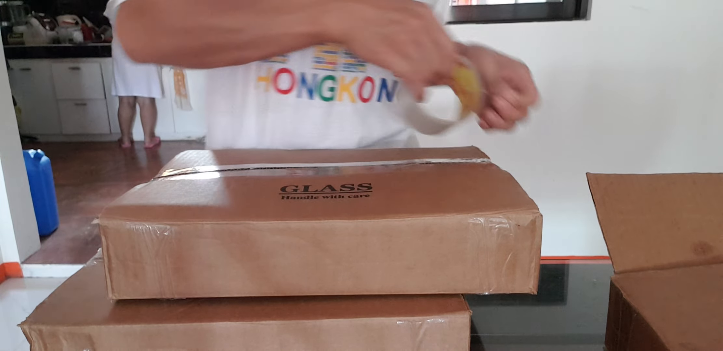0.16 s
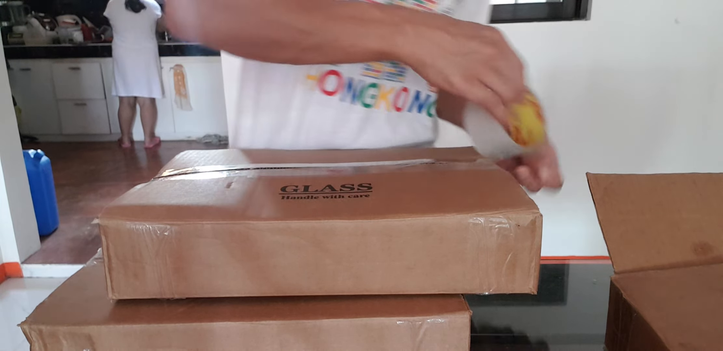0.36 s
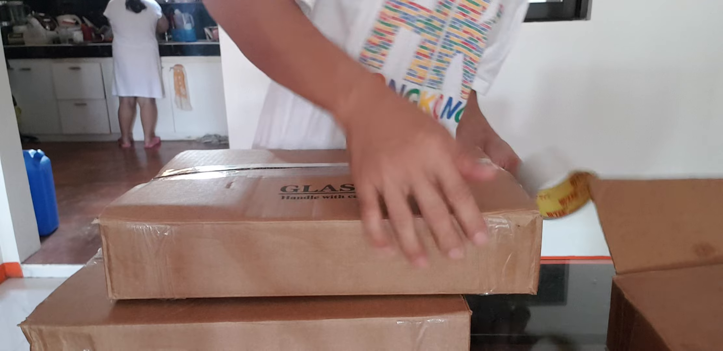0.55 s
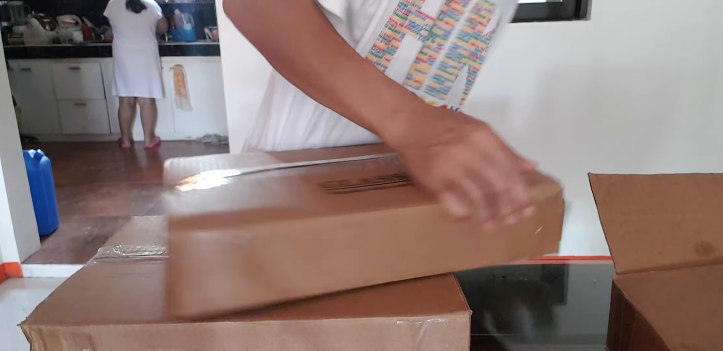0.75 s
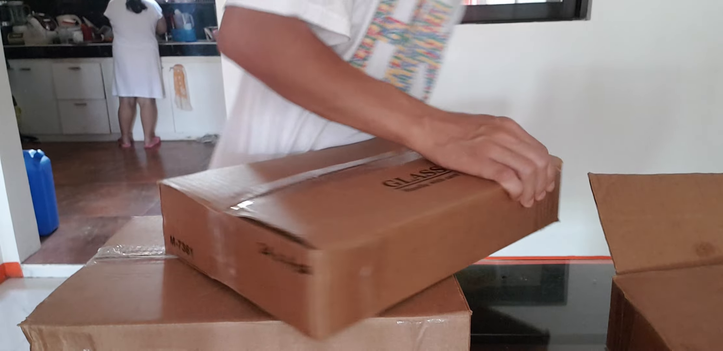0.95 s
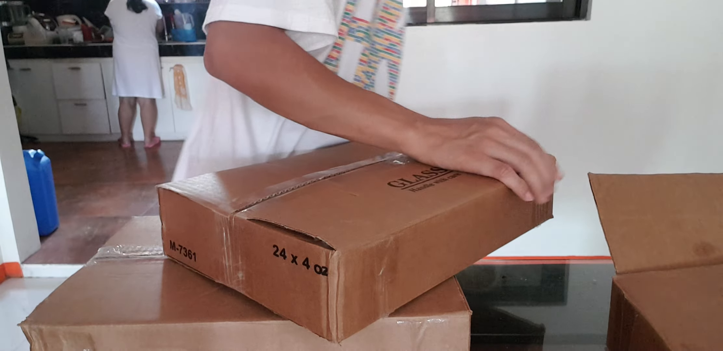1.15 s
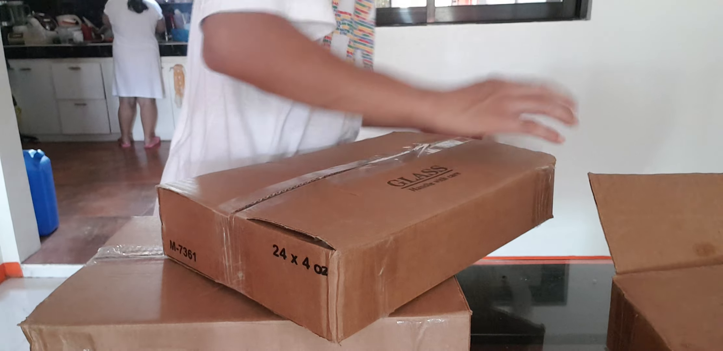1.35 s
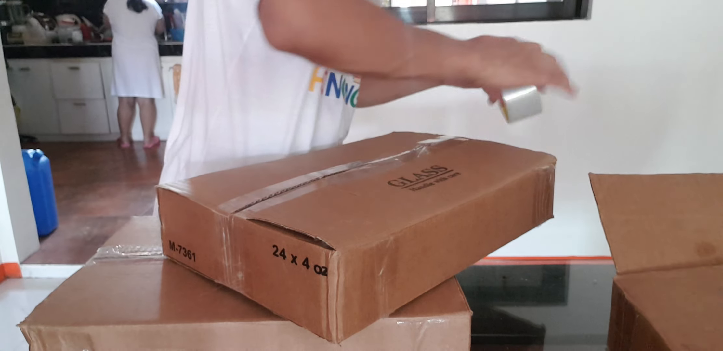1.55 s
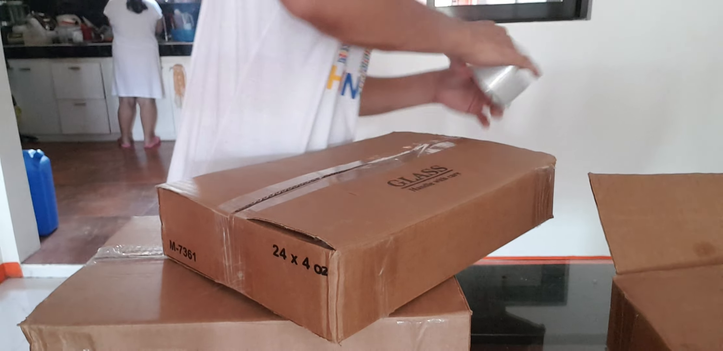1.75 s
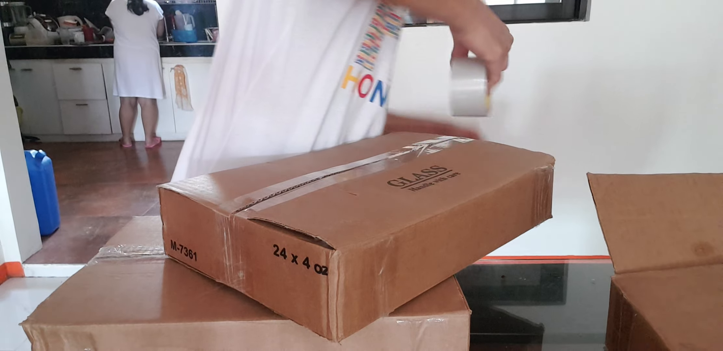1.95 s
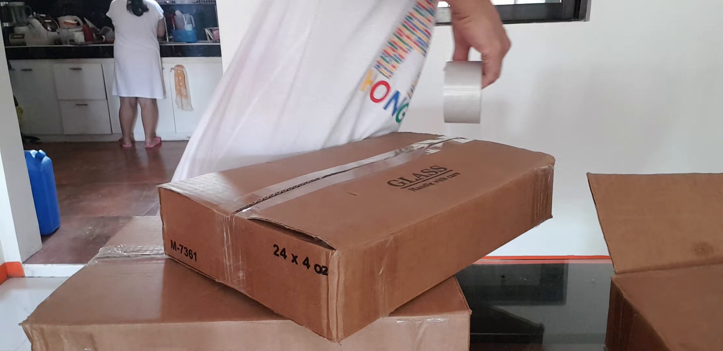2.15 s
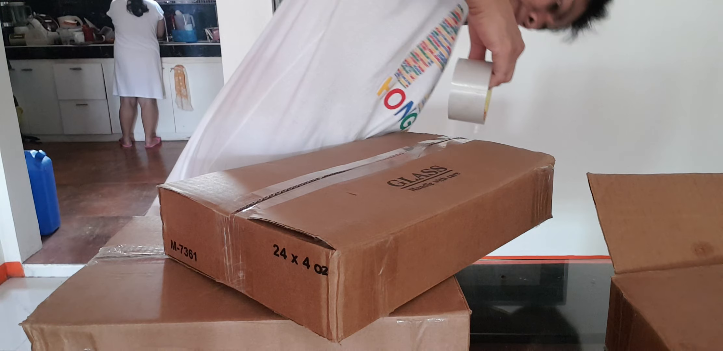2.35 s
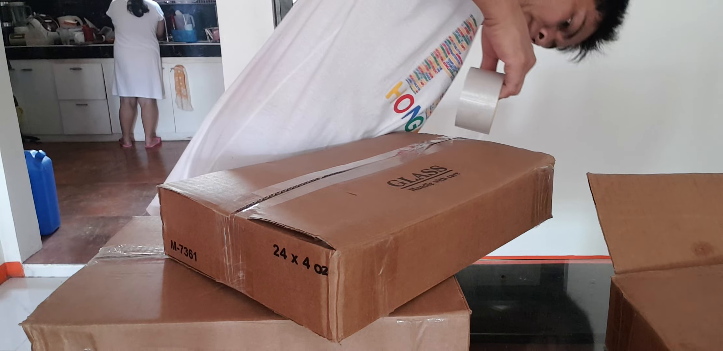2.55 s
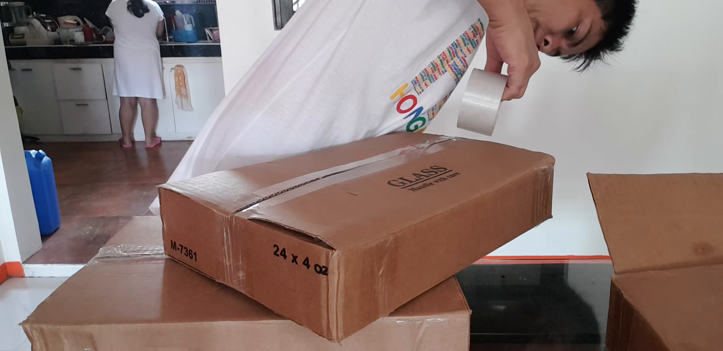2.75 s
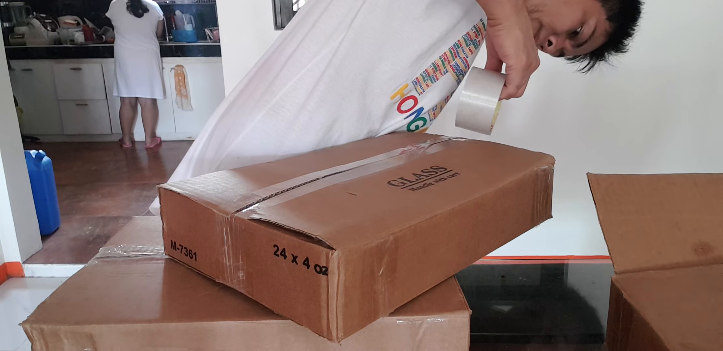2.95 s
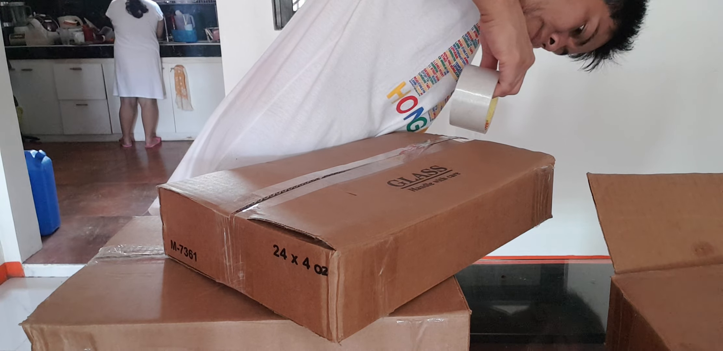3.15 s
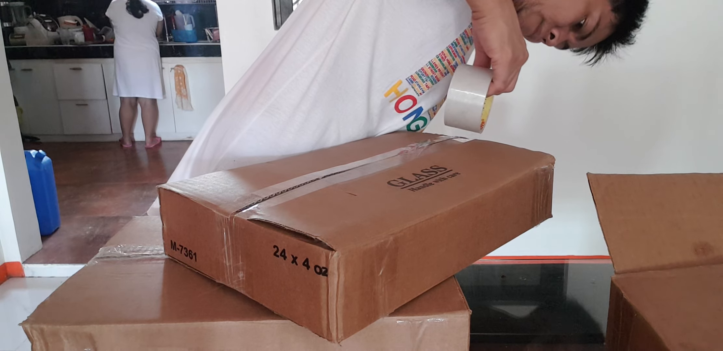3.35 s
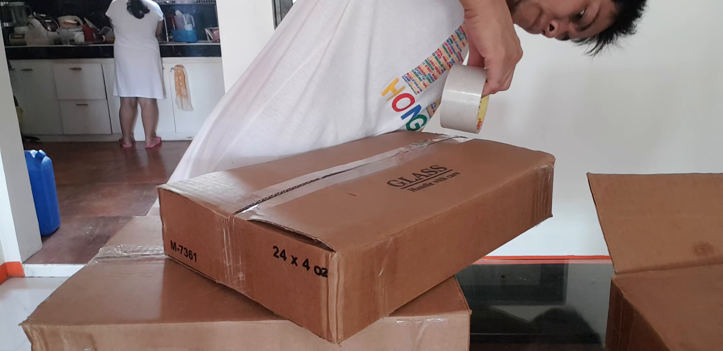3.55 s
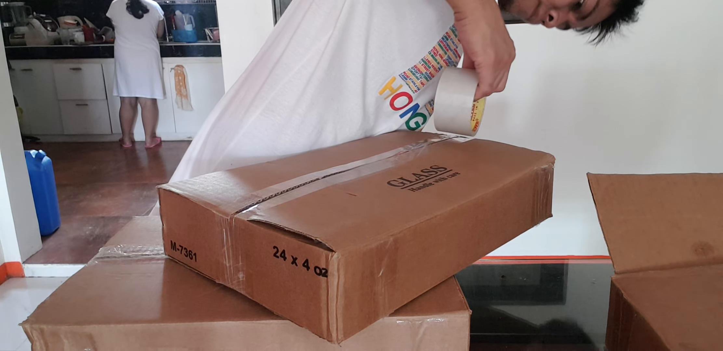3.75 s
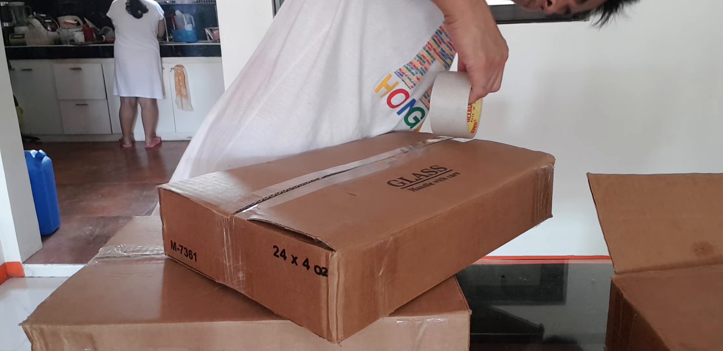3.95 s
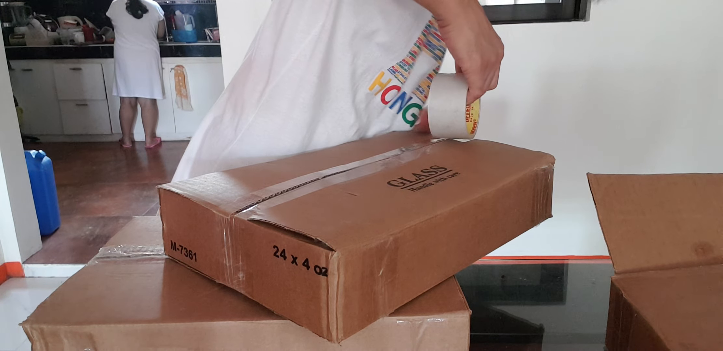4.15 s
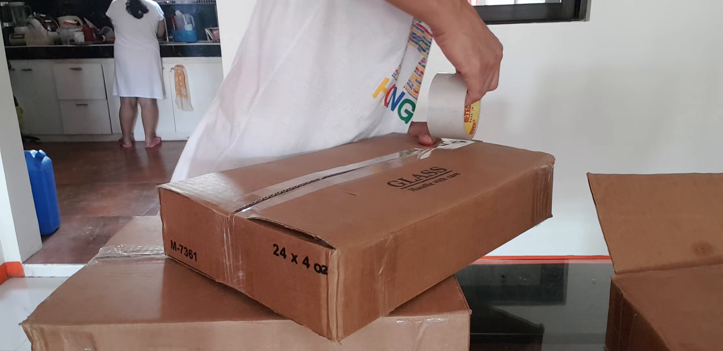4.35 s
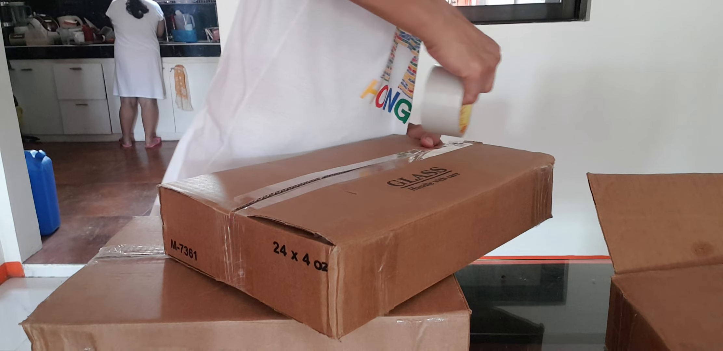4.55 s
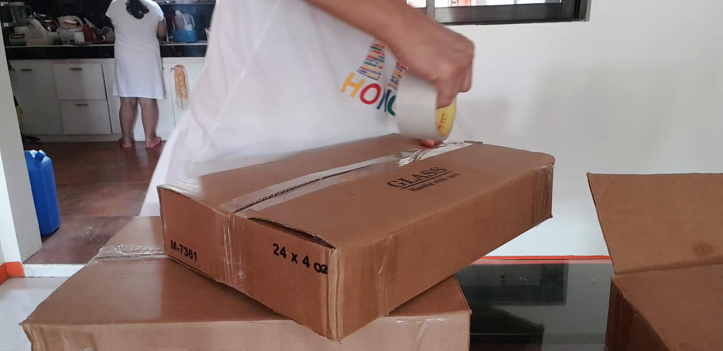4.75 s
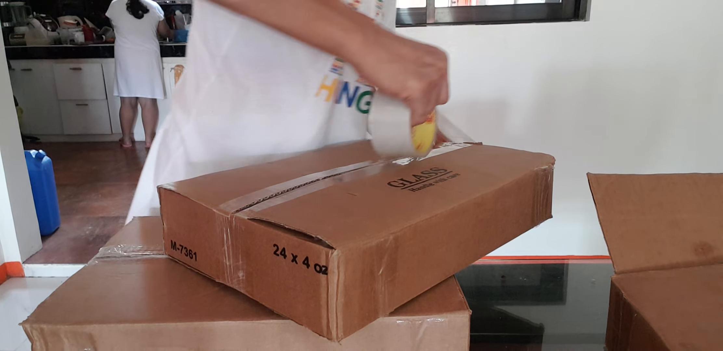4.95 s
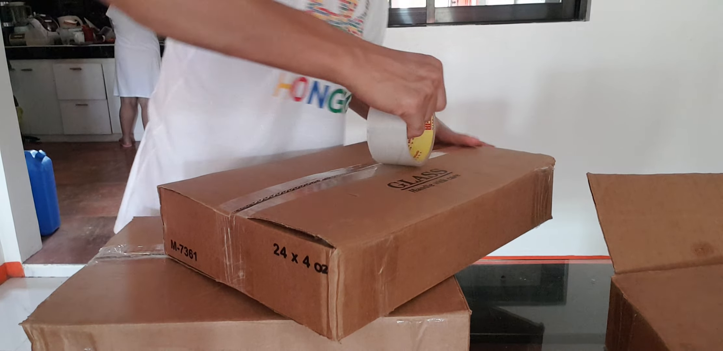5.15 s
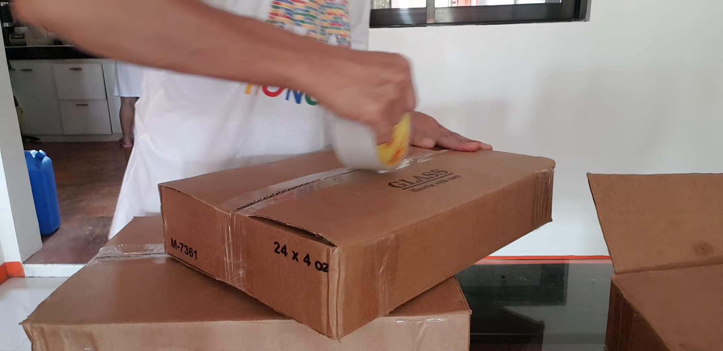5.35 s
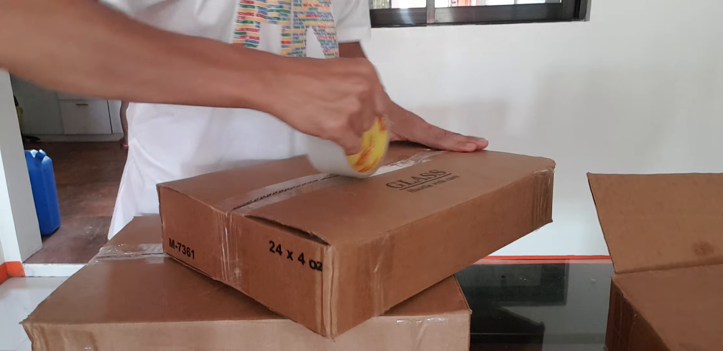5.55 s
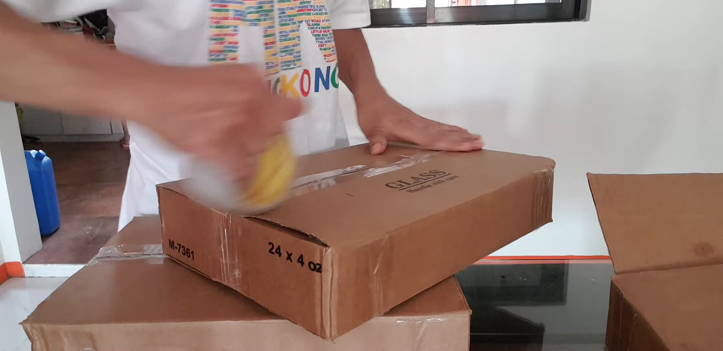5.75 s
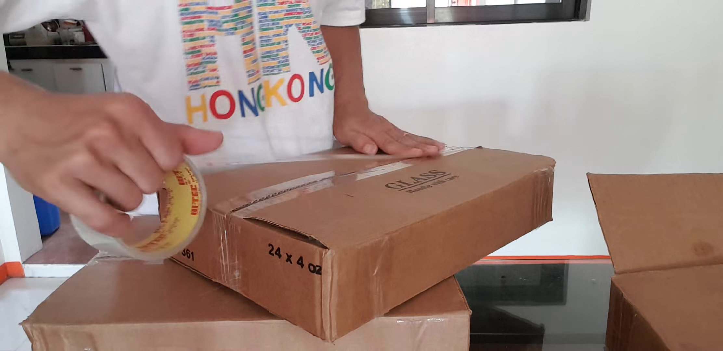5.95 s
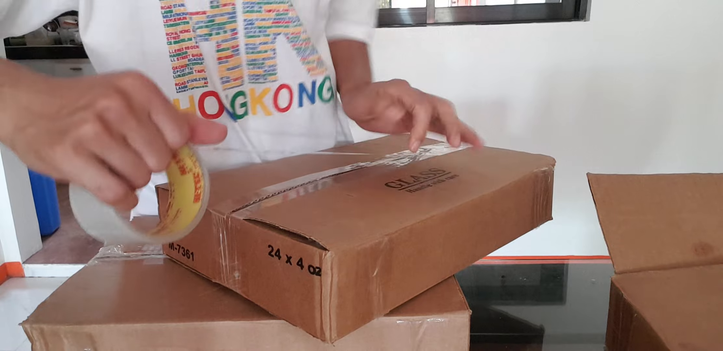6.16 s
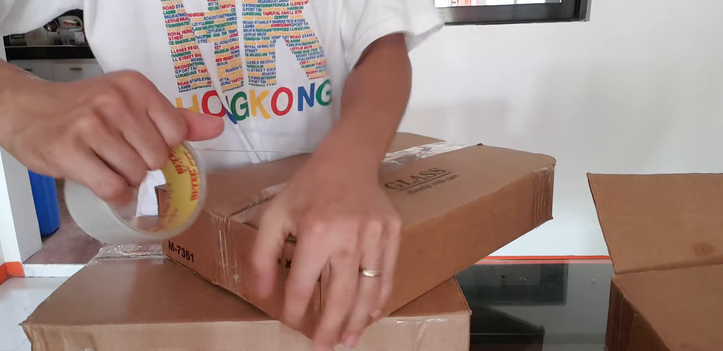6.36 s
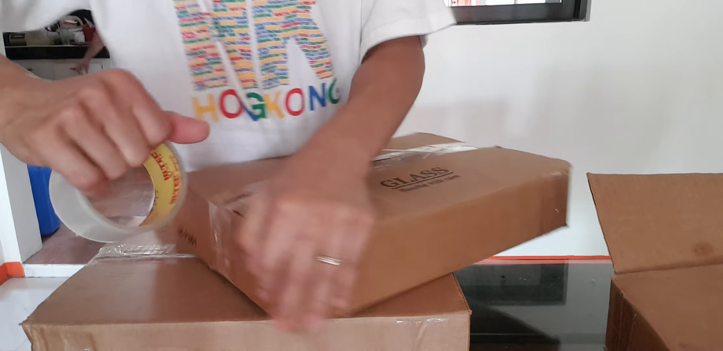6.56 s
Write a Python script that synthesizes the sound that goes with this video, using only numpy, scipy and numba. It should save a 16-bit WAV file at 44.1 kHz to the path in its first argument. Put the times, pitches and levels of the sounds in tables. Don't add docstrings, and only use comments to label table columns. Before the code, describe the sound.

Close, sharp tape tearing in short pulls, a cardboard box knocked and slid, thin plastic film creasing, over faint indoor hum.

```python
import sys
import numpy as np
from scipy import signal
from scipy.fft import rfft, irfft, next_fast_len
from scipy.io import wavfile
from scipy.ndimage import map_coordinates
from numba import njit

SR = 44100
rng = np.random.default_rng(int(sys.argv[2]) if len(sys.argv) > 2 else 0)


def to_wav(s):
    ch = np.atleast_2d(s).T
    pcm = np.round(np.clip(ch, -1, 1) * 32767)
    wavfile.write(sys.argv[1], SR, pcm.astype(np.int16))


def to_linear_factor(level_db):
    exponent = np.asarray(level_db, float) / 20
    return 10 ** exponent


N = 291501


def along(points, hz):
    f, v = np.transpose(points)
    return np.interp(np.log(hz + 1), np.log(f + 1), v)


def unit(x):
    return x / np.sqrt(np.mean(x ** 2) + 1e-20)


def wobble(knots_per_s):
    knots = rng.standard_normal(int(N * knots_per_s / SR) + 4)
    return map_coordinates(knots, [np.arange(N) * knots_per_s / SR])


def filtered(x, response):
    m = next_fast_len(N + SR // 2)
    h = response(np.fft.rfftfreq(m, 1 / SR))
    h = h / np.sqrt(np.mean(abs(h) ** 2))
    return irfft(rfft(x, m) * h, m)[..., :N]


def colour(spectrum):
    return lambda hz: to_linear_factor(np.maximum(along(spectrum, hz), -100))


def above(edge_hz):
    return lambda hz: 1 / (1 + (edge_hz / (hz + 1)) ** 6)


def modes(table):
    def response(f):
        total = 0
        for k, (centre, width, db) in enumerate(table):
            loss = 1j * f * width
            total = total + (-1) ** k * to_linear_factor(db) * loss / (centre * centre - f * f + loss)
        return total
    return response


@njit
def moving_resonance(x, step, damping):
    out, low, band = np.zeros((2, len(x))), 0., 0.
    for i in range(len(x)):
        low += step[i] * band
        high = x[i] - low - damping * band
        band += step[i] * high
        out[0, i], out[1, i] = band, high
    return out


def diffuse(pair):
    # f/Hz, left-right likeness
    likeness = [(60, 0.95), (130, 0.9), (290, 0.94), (640, 0.38), (1410, -0.11), (3100, 0.15),
                (6820, -0.083), (15000, 0.079)]

    def mixing(hz):
        turn = np.arccos(np.clip(along(likeness, hz), -1, 1)) / 2
        return np.array([np.cos(turn), np.sin(turn)])
    mid, side = filtered(pair, mixing)
    return np.array([mid + side, mid - side]) / np.sqrt(2)


def crackle(per_s, spread_db, life_s):
    starts = (rng.random(N) < per_s / SR) * to_linear_factor(spread_db * np.clip(rng.standard_normal(N), -2, 2))
    size = signal.lfilter([1], [1, -np.exp(-1 / (life_s * SR))], starts)
    bursts = unit(size * rng.standard_normal(N))
    return unit(np.tanh(bursts / 4.6))


def strokes(rows, attack_s, release_s):
    power, since, extra, t = np.full(N, 1e-20), np.zeros(N), np.zeros(N), np.arange(N) / SR
    for start, end, db, change_db, value in rows:
        span = slice(max(round(start * SR), 0), round((end + 12 * release_s) * SR))
        age = t[span] - start
        gain = to_linear_factor(db + change_db * np.clip(age / (end - start), 0, 1)) * np.clip(age / attack_s, 0, 1)
        power[span] += (gain * np.exp(-np.maximum(t[span] - end, 0) / release_s)) ** 2
        since[span], extra[span] = age, value
    return 10 * np.log10(power), since, extra


def tones(rows, attack_s, unsteady_rad):
    level_db, _, hz = strokes(rows, attack_s, release_s=.02)
    phase = 2 * np.pi * np.cumsum(hz) / SR
    return to_linear_factor(level_db + 4) * np.sin(phase + unsteady_rad * wobble(30))


def house():
    # f/Hz, level/dB per Hz
    air_spectrum = [(15, -52), (25, -12.5), (68, -2), (131, -8), (163, -2.5), (192, -9.5), (232, -5),
                    (445, -12), (568, -16), (634, -10), (809, -12), (2040, -21.5), (13300, -27),
                    (15200, -28), (16500, -48.5)]
    # f/Hz, level/dB
    appliances = [(161.4, -61.5), (560, -65.5), (300, -78)]
    air = diffuse(filtered(rng.standard_normal((2, N)), colour(air_spectrum)))
    t, hum = np.arange(N) / SR, 0
    for hz, db in appliances:
        hum = hum + to_linear_factor(db + 3.3 * wobble(12)) * np.sin(2 * np.pi * hz * t + 1.3 * wobble(25))
    return to_linear_factor(-55 + .7 * wobble(1.695)) * unit(air) + hum


def hands():
    # start t/s, end t/s, level/dB, change by end/dB, top/dB re level
    rustles = [(0.0, 0.135, -27.5, -15, 1), (0.5, 0.78, -42.5, -6, -9), (0.79, 1.05, -39, -9, 3),
               (1.16, 1.55, -53, 5.5, -2), (1.59, 1.86, -42.5, 0.5, -5), (2.6, 2.8, -56, -14, -5),
               (2.92, 3.12, -62, 0, -11), (3.19, 3.3, -54, 5.5, -14), (3.3, 3.45, -45.5, -17, -16),
               (3.7, 3.8, -54, -3.5, -21), (3.88, 4.3, -60, 7.5, -20), (4.31, 4.39, -43, -10, -7),
               (4.394, 4.535, -33.5, -12, -10), (5.19, 5.26, -29.5, -14, -16), (6.41, 6.46, -39, -14, 1.5)]
    # f/Hz, level/dB per Hz
    film_spectrum = [(530, 1), (900, -1.5), (3350, 4), (4830, 0.5), (8760, 0.5), (13700, 1), (15900, 0),
                     (16500, -18)]
    # start t/s, end t/s, level/dB, change by end/dB, f/Hz
    squeaks = [
        (5.205, 5.24, -47, -5, 1730),
    ]
    level_db, _, top_db = strokes(rustles, attack_s=0.0056, release_s=0.01)
    creases = to_linear_factor(level_db - 8.0 + 0.83 * wobble(40)) * crackle(1500, spread_db=2, life_s=0.0013)
    body = filtered(creases, colour(film_spectrum))
    top = filtered(creases * to_linear_factor(top_db - 10.0), above(8900))
    return body + top + tones(squeaks, attack_s=0.013, unsteady_rad=.6)


def snaps(events, life_s):
    t, out = np.arange(SR // 50) / SR, np.zeros((3, N + SR))
    shape = (1 - np.exp(-t / 0.000088)) * np.exp(-t / life_s)
    for s, db, body_db, top_db in events:
        puff = rng.standard_normal((2, len(t))) * shape
        puff = puff * np.linalg.norm(shape) / np.linalg.norm(puff, axis=1, keepdims=True)
        middle = np.sqrt(max(1 - to_linear_factor(top_db) ** 2, .03))
        jerk = to_linear_factor(body_db + 4.5) * (np.exp(-t / .0001) + 0.42 * puff[0])
        burst = np.array([middle * puff[0], to_linear_factor(top_db) * puff[1], jerk])
        out[:, round(s * SR):][:, :len(t)] += to_linear_factor(db) * burst
    band = lambda hz: above(2800)(hz) * (1 - above(9000)(hz))
    return filtered(out[0, :N], band) + filtered(out[1, :N], above(8500)), out[2, :N]


def strip():
    lengths = [
        (0.16, 0.249, 2550, 626, -12.5),
        (1.88, 2.037, 1130, 240, -11.5),
        (4.552, 4.79, 600, 392, -7.5),
        (4.85, 5.035, 300, 257, -10.5),
        (5.31, 5.693, 250, 171, -7.5),
        (5.751, 5.88, 505, 550, -0.5),
        (5.883, 5.995, 640, 396, 1),
        (6.473, 6.518, 805, 503, -2.5),
    ]
    start, end, first_hz, last_hz, db = np.transpose(lengths)
    t = np.arange(N) / SR
    hz = 1 / np.interp(t, np.ravel([start, end], 'F'), 1 / np.ravel([first_hz, last_hz], 'F'))
    k = np.maximum(np.searchsorted(start, t) - 1, 0)
    slack_db, taut_s = 0.5, 0.09
    return hz, db[k] + slack_db * np.exp(-abs(t - start[k]) / taut_s)


def tape():
    # start t/s, end t/s, peel level/dB, change by end/dB, roll/dB re peel
    tugs = [(0.146, 0.18, -16.5, -4.5, 2.5), (0.185, 0.218, -17.5, -1, -1.5), (1.895, 1.93, -22.5, -4, -10),
            (1.93, 2.0, -17.5, -2.5, -2.5), (2.0, 2.09, -16.5, -8.5, -3.5), (4.544, 4.7, -17.5, -1, -2),
            (4.7, 4.84, -20, -13, 0), (4.868, 5.035, -26.5, 0, -1), (5.293, 5.32, -28.5, -2, 1.5),
            (5.32, 5.43, -27.5, 0.5, 2), (5.43, 5.575, -25.5, -10, 3), (5.608, 5.64, -29.5, 1, 2),
            (5.64, 5.75, -26, 4, 2.5), (5.75, 5.82, -24.5, 0, 3.5), (5.82, 5.875, -24, -7.5, 3),
            (5.885, 5.95, -28.5, 4, 0), (5.95, 6.022, -26.5, -7, -3.5), (6.473, 6.515, -20.5, -13.5, 2)]
    # t/s, peak level/dB
    slip_events = [(0.1434, -18), (0.166, -9.5), (1.8936, -15), (4.5432, -4), (4.7378, -6), (4.7608, -1),
                   (4.784, -0.5), (4.7912, -6), (4.813, -16), (4.8444, 0), (4.8689, 5.5), (4.8988, -1),
                   (4.9066, -4), (4.9287, 2.5), (4.9521, -0.5), (4.979, -7), (5.026, -13), (5.2945, -20),
                   (5.3246, -9.5), (5.375, -19), (5.4898, -4), (5.6057, -16.5), (5.6373, -10),
                   (5.9178, -23), (5.9394, -31), (5.9652, -13.5), (5.9864, -13), (6.001, -33),
                   (6.4865, -30), (6.4995, -22)]
    # t/s, peak level/dB, body/dB re snap
    snap_events = [(0.0073, -12.5, -34), (0.0148, -12, -29), (0.0294, -2, -26), (0.638, -18, -9.5),
                   (0.6717, -15.5, -17.5), (0.791, -16, -23), (1.6027, -22, -12), (1.6265, -23.5, -15),
                   (1.662, -24.5, -15), (1.7004, -19.5, -17), (1.7103, -26, -18), (1.7265, -21.5, -14),
                   (1.8057, -26, -14), (1.8141, -21, -18), (1.867, -8, -15.5), (1.8785, -11.5, -14),
                   (1.886, -9, -12), (4.3107, -29.5, -11), (4.317, -27.5, -12), (4.3325, -27, -19),
                   (4.3674, -28, -15), (4.3974, -12, -11), (4.4561, -13, -3.5), (4.4731, -7.5, -7),
                   (6.145, -10.5, -43), (6.415, -59, -27), (6.4226, -32.5, -8.5), (6.4505, -44, -12),
                   (6.4734, -12.5, 3.5), (6.6016, -13.5, -27)]
    # f/Hz, level/dB per Hz
    crack_spectrum = [(410, -2), (700, 1), (1290, -4.5), (1590, 0), (2300, -6.5), (2520, 0.5), (2810, 0),
                      (9600, -5.5), (14800, -2.5), (15900, -2), (16500, -100)]
    # f/Hz, width/Hz, level/dB
    roll_modes = [(1040, 140, 3.5), (1616, 355, 15.5), (2312, 250, 4)]

    peel_db, since_s, roll_db = strokes(tugs, attack_s=0.0012, release_s=0.0034)
    clump_db = 0.26 * (-16.5 - peel_db)
    bite_db, bite_s = -2, 0.0027
    peel_db = peel_db + bite_db * np.exp(-since_s / bite_s)
    surge_db, surge_s = 10, .008
    onsets = [round(s * SR) for s, _ in slip_events]
    surge = np.bincount(onsets, [to_linear_factor(db / 2) for _, db in slip_events], N)
    peel_db = peel_db + surge_db * signal.lfilter([1], [1, -np.exp(-1 / (surge_s * SR))], surge)
    hz, strip_db = strip()
    clumps = to_linear_factor(np.clip(clump_db, 0, 4.5) * np.tanh(0.25 * wobble(60) + 0.65 * wobble(300)))
    force = to_linear_factor(peel_db - 1.5) * clumps * crackle(3500, spread_db=2.5, life_s=.00012)

    snap_rows = [(s, db, body, min(-1.5 - 0.3 * (body + 15), 0)) for s, db, body in snap_events]
    snap, snap_jerk = snaps(snap_rows, life_s=0.00074)
    slip_rows = [(s, db, -11, -2.5) for s, db in slip_events]
    slip, slip_jerk = snaps(slip_rows, life_s=0.0003)
    jerk = to_linear_factor(-4.5) * snap_jerk + to_linear_factor(-7) * slip_jerk

    crack = to_linear_factor(2.5) * filtered(force, colour(crack_spectrum)) + to_linear_factor(-3.5) * snap + to_linear_factor(-10.5) * slip
    roll = filtered(force * to_linear_factor(roll_db - 0.5) + jerk, modes(roll_modes))
    step = 2 * np.sin(np.pi * hz / SR)
    drum = moving_resonance((force + 1.7 * jerk) * to_linear_factor(strip_db), step, 0.23)[0] * np.sqrt(0.52 / step)
    sound = crack + roll + drum
    for _ in range(2):
        sound = moving_resonance(sound, 0.48 * step, 2.045)[1]
    return sound


def box():
    # t/s, peak level/dB, panel/dB re knock, thud f/Hz
    knocks = [(0.323, -35.5, -4, 335), (0.586, -10.5, -8.5, 245), (0.635, -13.5, -21, 265),
              (0.67, -27.5, -13, 243), (0.708, -32, -34, 240), (0.741, -37, 2, 253), (0.784, -39, 1.5, 283),
              (0.93, -19, -11.5, 200), (0.958, -29.5, -18, 170), (4.308, -34.5, -18, 286),
              (4.337, -34, -11, 216), (5.295, -29, -14, 277), (6.419, -29.5, -23, 226),
              (6.473, -16.5, -0.5, 270), (6.528, -21.5, -10, 360)]
    # f/Hz, width/Hz, level/dB
    box_modes = [(104.6, 12.4, -16), (180.6, 48, 2.5), (277, 51, 2.5), (316, 71, -1)]
    # f/Hz, width/Hz, level/dB
    panel_modes = [(447, 29, 9.5), (600, 150, 1.5), (698, 89, 2), (930, 140, -17)]
    # start t/s, end t/s, cavity level/dB, change by end/dB, wall/dB re cavity
    slides = [
        (0.6, 0.9, -46, -16.5, 6.5),
        (0.93, 1.06, -49.5, -8, 11),
        (1.04, 1.4, -57, -16, 7),
        (5.27, 5.4, -51.5, 0.5, 7),
        (5.4, 5.62, -43.5, 1, 0),
        (5.65, 6.12, -48.5, -8.5, 11),
    ]
    # start t/s, end t/s, level/dB, change by end/dB, f/Hz
    rings = [
        (0.6, 0.86, -48, -8, 103),
        (0.95, 1.08, -50, 7, 107),
        (1.08, 1.37, -43, -17, 108),
    ]

    t, thud, blows = np.arange(SR // 10) / SR, np.zeros(N + SR), np.zeros((2, N))
    for s, db, panel_db, hz in knocks:
        thud[round(s * SR):][:len(t)] += to_linear_factor(db - 3.0 - 60 * t / 0.032) * np.sin(2 * np.pi * hz * t)
        blows[:, round(s * SR)] = to_linear_factor([db - 0.5, db + panel_db + 15.5])
    struck = filtered(blows[0], modes(box_modes)) + filtered(blows[1], modes(panel_modes))
    cavity_db, _, wall_db = strokes(slides, attack_s=0.012, release_s=0.017)
    rub = to_linear_factor(cavity_db - 4.0 + 2.6 * wobble(25)) * rng.standard_normal((2, N))
    cavity = filtered(rub[0], lambda hz: modes(box_modes[:1])(hz) ** 2)
    walls = filtered(rub[1] * to_linear_factor(wall_db), modes(box_modes[1:]))
    return thud[:N] + struck + cavity + walls + tones(rings, attack_s=.03, unsteady_rad=.25)


def room(x, build_s, stretch):
    # f/Hz, t60/s
    decay = [(100, 0.63), (250, 0.47), (500, 0.73), (2000, 0.82), (5000, 0.73), (10000, 0.59),
             (16000, 0.36)]
    hz, t, z = signal.stft(rng.standard_normal((2, SR)), SR, nperseg=256)
    fall = to_linear_factor(-60 * t / stretch / along(decay, hz)[:, None])
    tail = signal.istft(z * fall, SR, nperseg=256)[1]
    tail = tail * (1 - np.exp(-(np.arange(tail.shape[1]) / SR / build_s) ** 2))
    tail = tail / np.linalg.norm(tail[0])
    return diffuse(signal.fftconvolve(x[None], tail, axes=1)[:, :N])


def ports(x):
    # t/s, left lead/samples
    position = [(0, 7.5), (5.1, 5.5), (5.28, 4.5), (5.8, 6), (5.9, -1), (6.6, 0)]
    n = np.arange(N)
    s, lead = np.transpose(position)
    lead = np.interp(n / SR, s, lead)
    direct = np.array([map_coordinates(x, [n + k * lead], order=5) for k in (.5, -.5)])
    z = signal.stft(x, nperseg=1024)[2]
    fall = np.exp(-np.arange(256) / SR / 0.0013)
    scatter = rng.standard_normal((2, z.shape[1], 256)) * fall / np.linalg.norm(fall)
    near = signal.istft(z * rfft(scatter, 1024).transpose(0, 2, 1), nperseg=1024)[1][:, :N]
    bounce = lambda hz: 1 / (1 + (1200 / (hz + 1)) ** 4)
    return to_linear_factor(-3.0) * direct + to_linear_factor(-4) * filtered(near, bounce)


def scene():
    film, rip, thud = hands(), tape(), box()
    early = room(to_linear_factor(-9.5) * (rip + film) + to_linear_factor(-4.5) * thud, build_s=0.0091, stretch=0.12)
    late_send = to_linear_factor(-6.0) * rip + to_linear_factor(-2.0) * film + to_linear_factor(-3.0) * thud
    late = room(late_send, build_s=0.00874, stretch=1.102)
    return ports(rip + film) + thud + early + late + house()


def band_limit(x):
    return signal.sosfilt(signal.butter(12, 17030, fs=SR, output="sos"), x)


def record(dry):
    # f/Hz, left level/dB re right
    port_tilt = [(300, 1), (1500, 0.6), (7000, 0), (10000, 2.5), (15000, 4.5)]

    def mic(hz):
        tilt = to_linear_factor(along(port_tilt, hz) * np.array([[.5], [-.5]]))
        return tilt / (1 + (70 / (hz + 1)) ** 4) ** .5 / (1 + (hz / 16200) ** 40)
    x = filtered(dry, mic)
    fade = np.exp(-1 / (.3 * SR))
    loudness = signal.lfilter([1 - fade], [1, -fade], np.mean(x ** 2, axis=0))
    x = x / (1 + loudness / to_linear_factor(-24)) ** 0.026
    return band_limit(x / (1 + abs(x) ** 6) ** (1 / 6))


dry = scene()
out = record(dry)
to_wav(out)
```